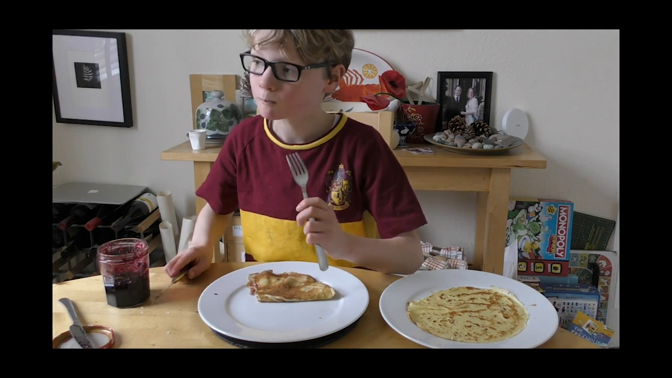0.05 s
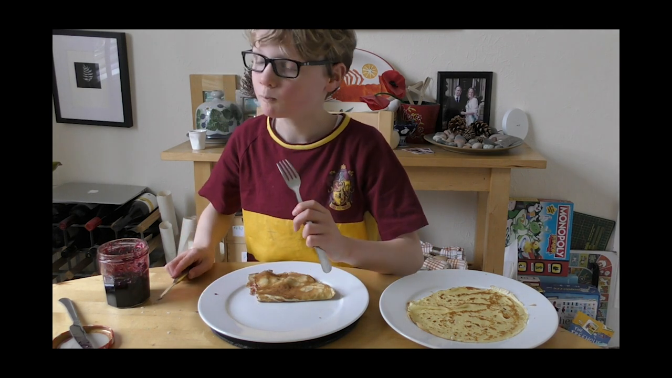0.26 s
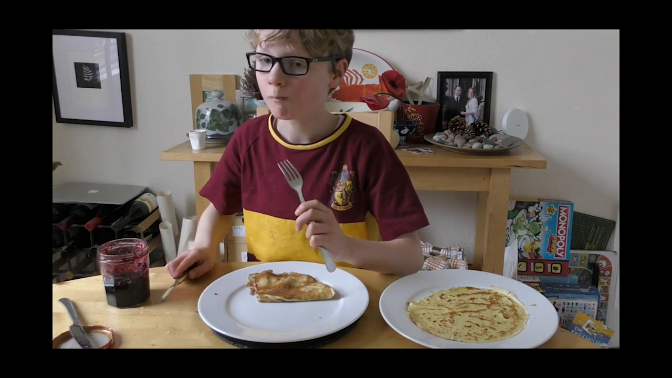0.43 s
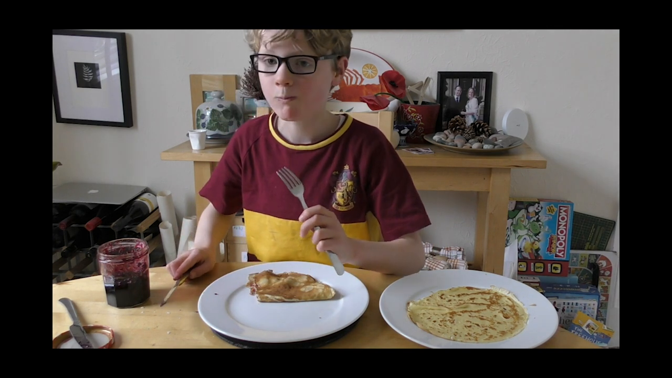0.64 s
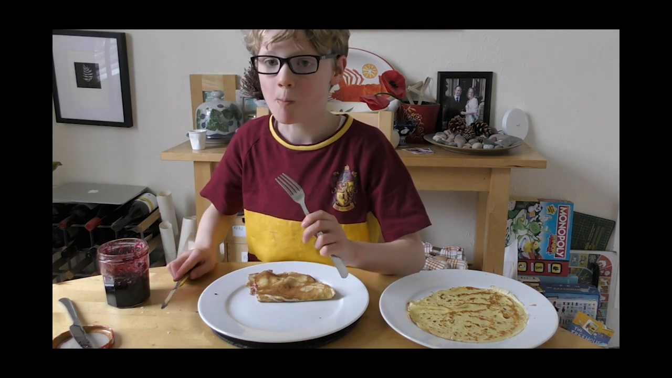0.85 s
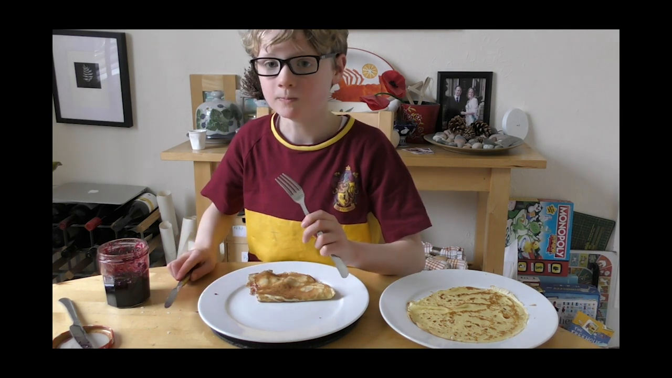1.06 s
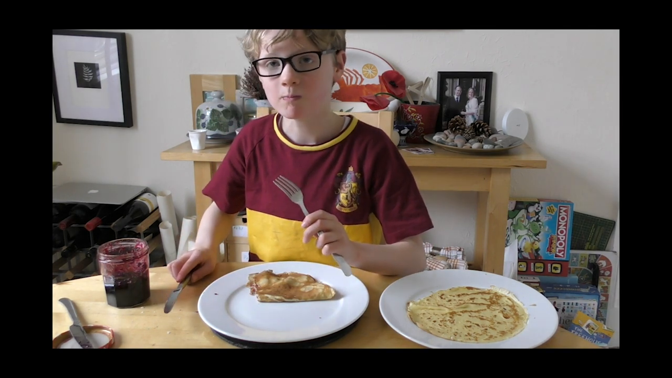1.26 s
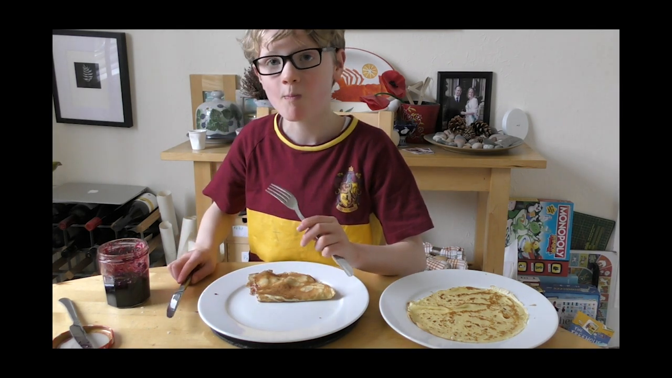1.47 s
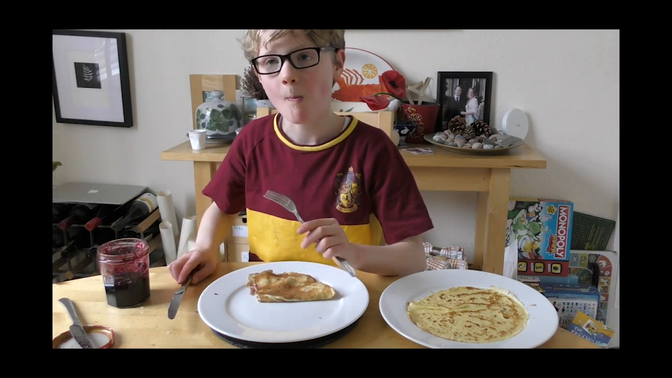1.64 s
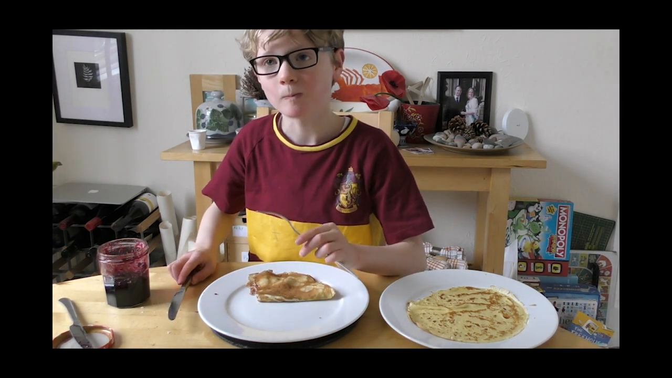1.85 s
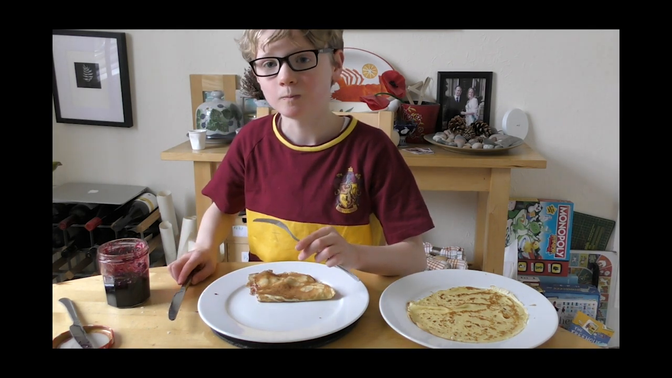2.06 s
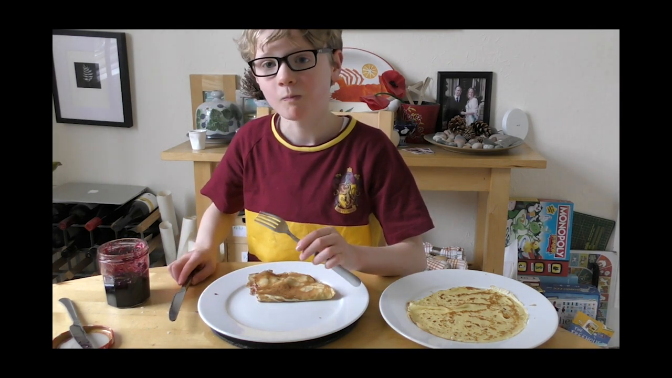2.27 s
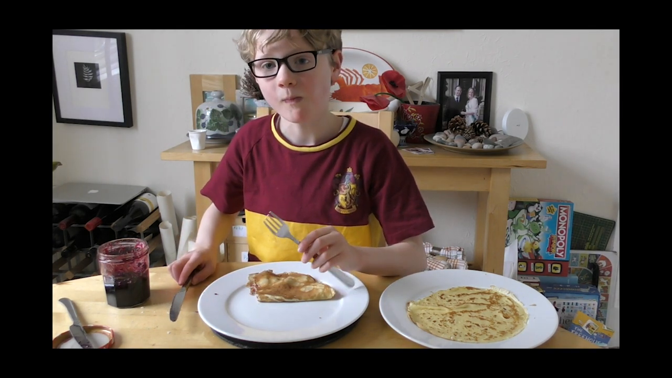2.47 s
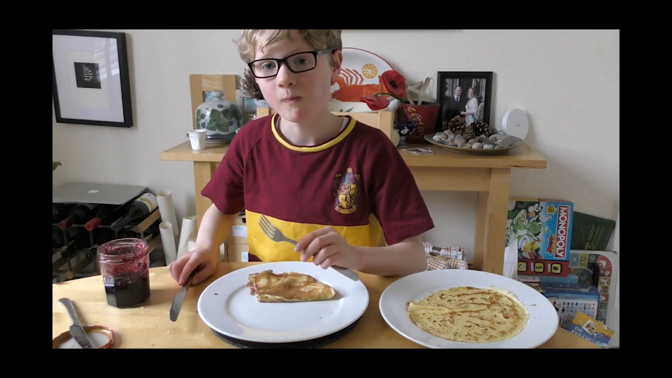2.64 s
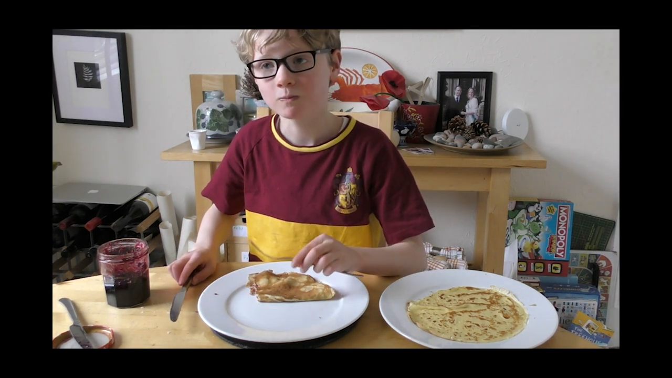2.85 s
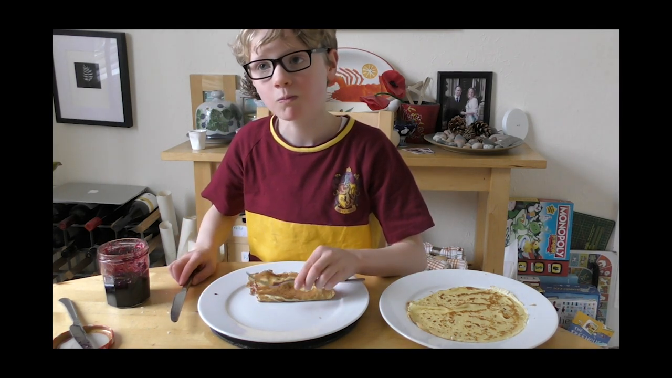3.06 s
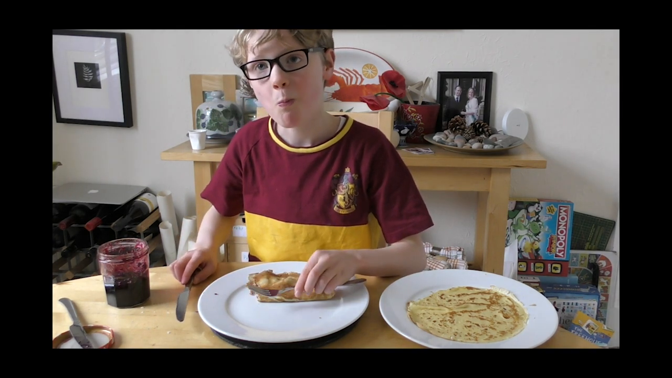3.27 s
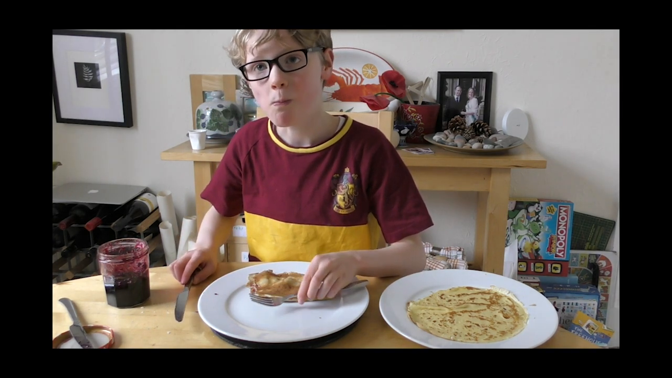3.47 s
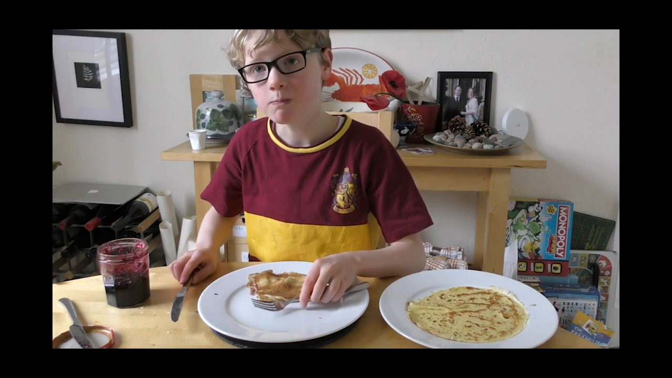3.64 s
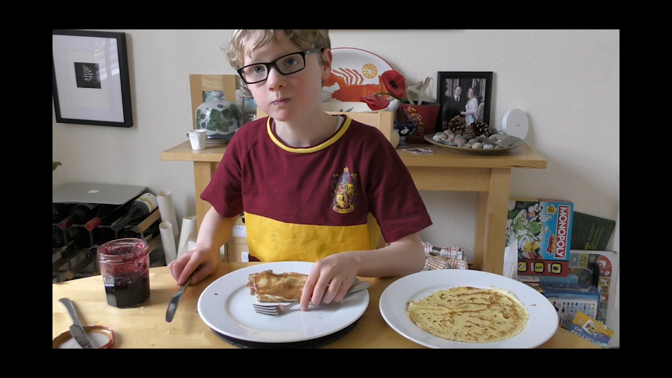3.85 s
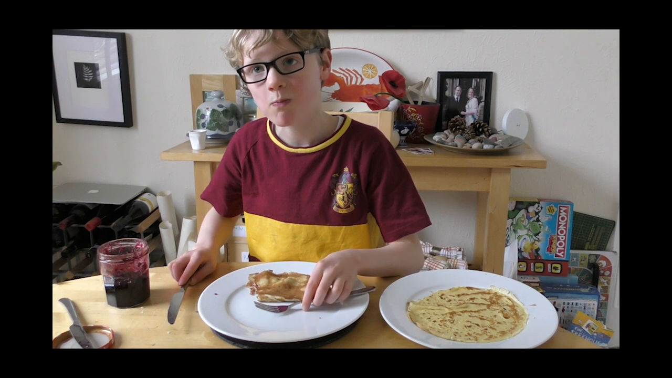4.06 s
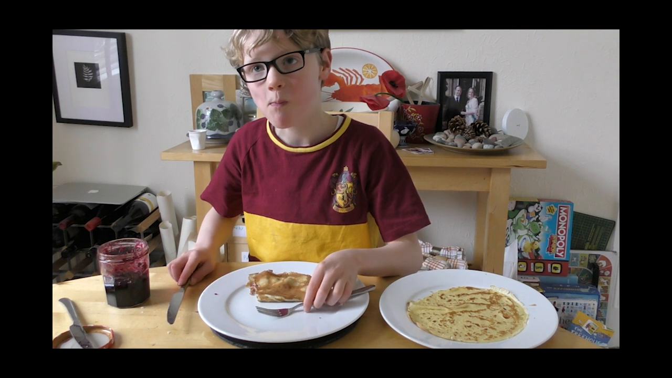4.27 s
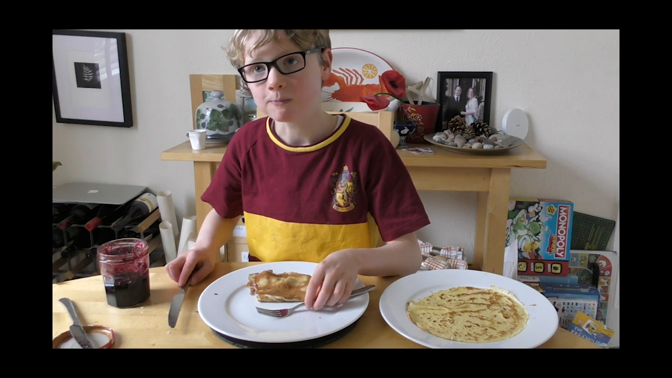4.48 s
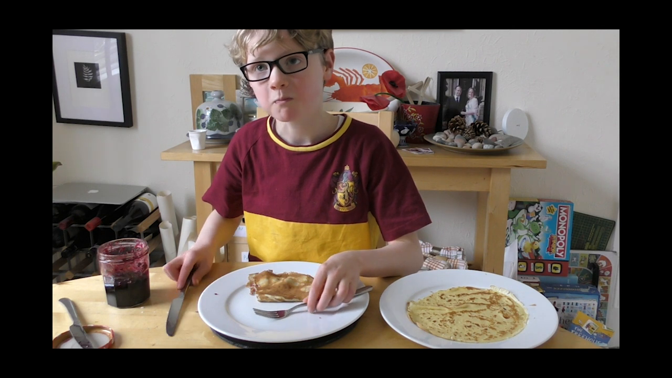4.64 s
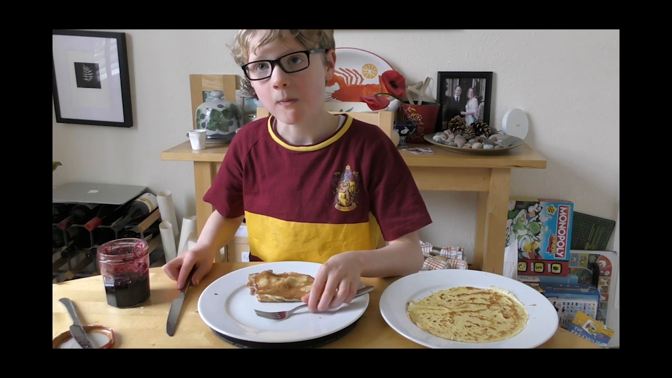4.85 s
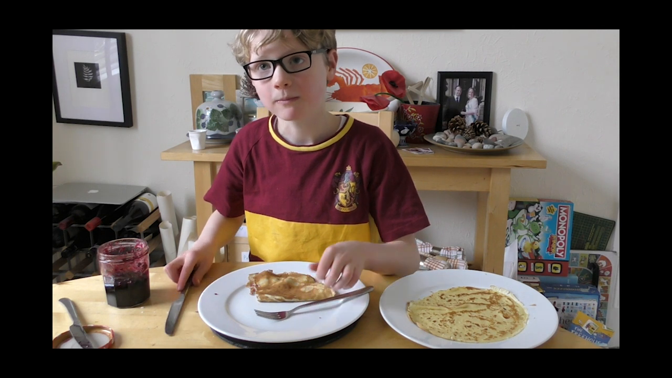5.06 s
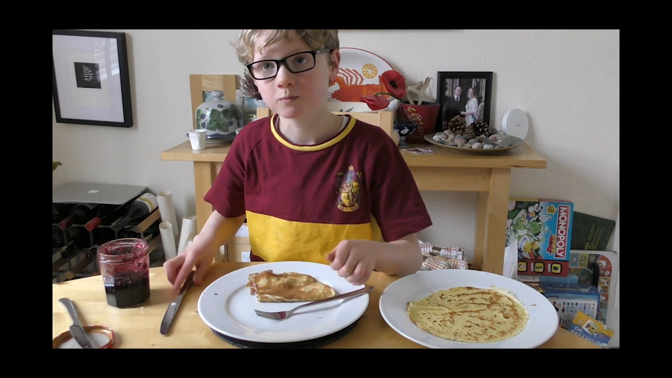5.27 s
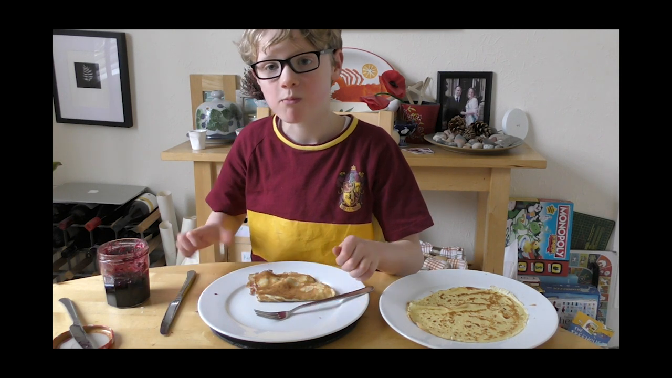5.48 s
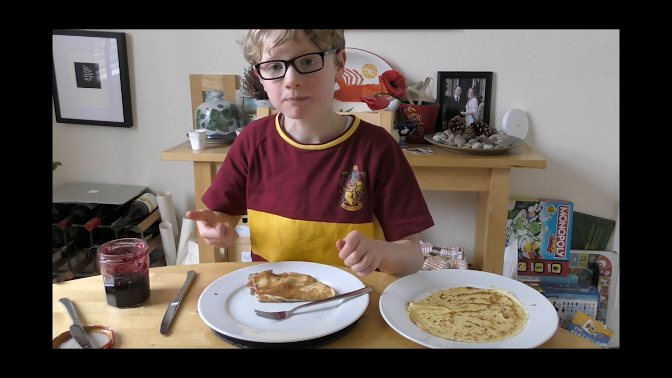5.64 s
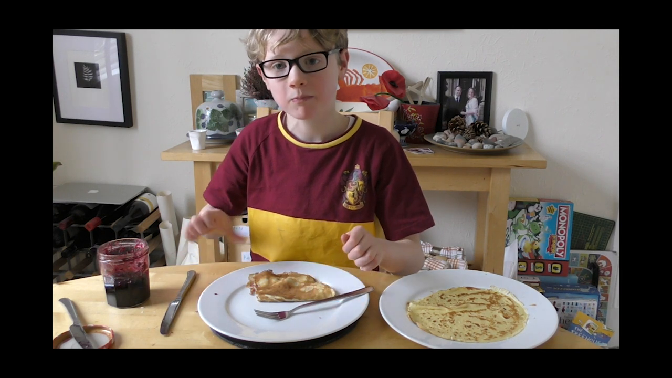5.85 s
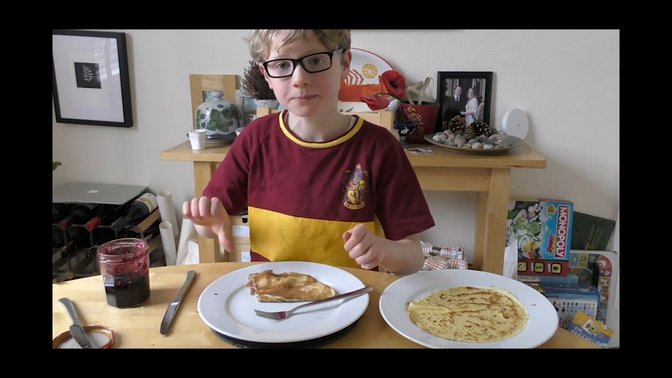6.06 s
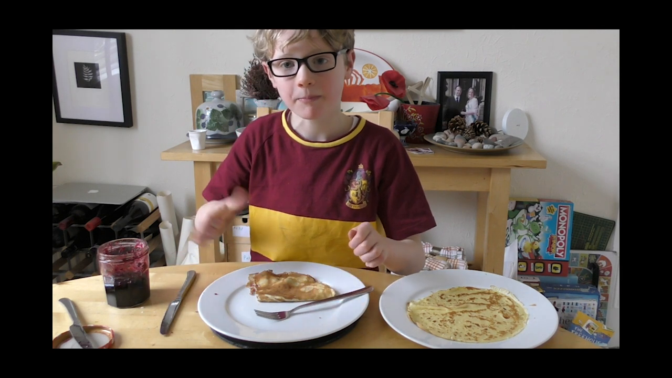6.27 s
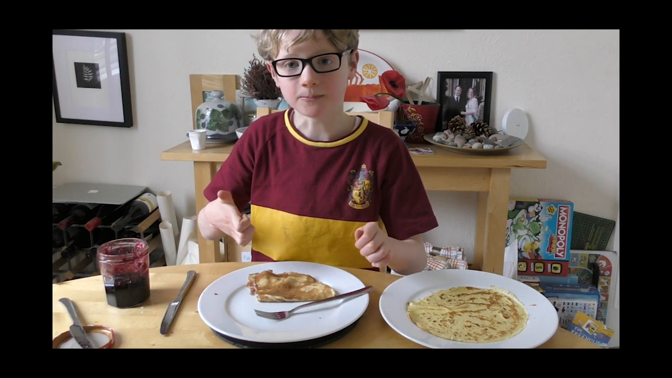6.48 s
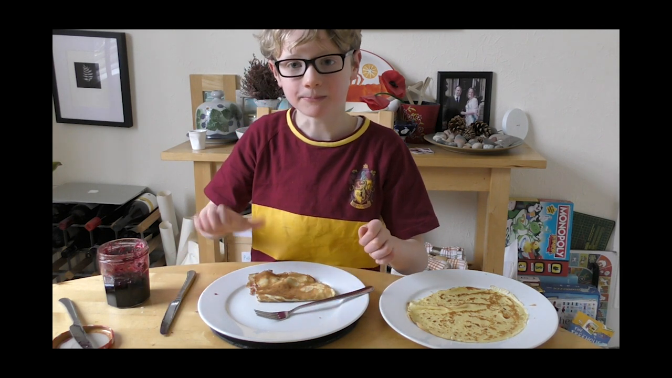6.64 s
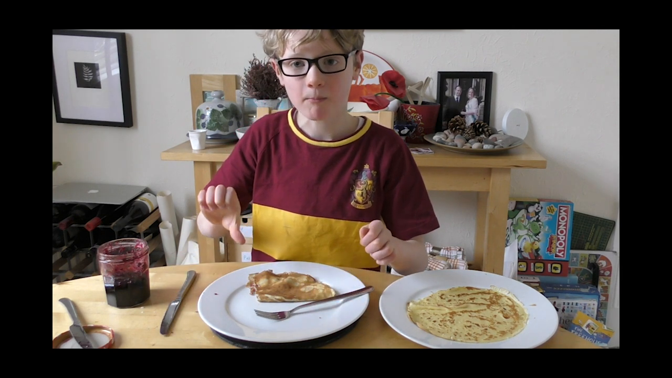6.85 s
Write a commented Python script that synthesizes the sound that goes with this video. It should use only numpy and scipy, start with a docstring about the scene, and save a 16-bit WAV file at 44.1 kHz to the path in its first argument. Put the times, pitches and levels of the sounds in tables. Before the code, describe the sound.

Close view of a dining table in a quiet small room with low rumble and faint hiss. After faint ticks and soft hand brushes, a fork strikes a china plate with a sharp ringing clink, then again a second later. It clatters down onto the plate, and a knife slides briefly and lands on wood with a dull rattling knock. Quiet follows.

```python
"""In a small dining room, a steel fork taps a china plate twice, then clatters down onto it.
A knife slides and is laid on the wooden table, where it rocks to rest. Hands and cutlery brush softly in between.
Hard contacts are short noise bursts and fading sine tones; sliding and brushing are shaped noise.
The room answers with a fading noise tail, over a low rumble, faintly wavering air and a hiss.
"""
import sys
import numpy as np
from scipy import signal
from scipy.fft import rfft, irfft, next_fast_len
from scipy.io import wavfile
from scipy.ndimage import map_coordinates

SR = 44100
rng = np.random.default_rng(int(sys.argv[2]) if len(sys.argv) > 2 else 0)


def store_wav(level_fs):
    """Save 16-bit WAV to argv[1]."""
    pcm = np.round(np.clip(np.atleast_2d(level_fs), -1, 1) * 32767)
    wavfile.write(sys.argv[1], SR, pcm.T.astype(np.int16))


N = 304731
TIPS, EDGE, BACK = 0, 1, 2  # the part of the fork that touches: tine tips, tine edge, back
TOP_HZ = 16900  # band limit of the whole sound
AGE = np.arange(int(.62 * SR)) / SR  # seconds since a contact


def fork(chatter_hz=90, between_db=-18, ring_wet_db=-5):
    """Each contact cracks and rings the plate; the tines chatter, which smears the modes into a short buzz."""
    # Fork and plate ringing together. Each row: frequency in Hz, free t60 (time to fade by 60 dB) in seconds,
    # then the level in dB when touched with the tine tips, with the tine edge, with the fork's back.
    plate_modes = [(1600, 0.2, -24, -40, -12), (1902, 0.18, -26, -28, -13), (1950, 0.23, -4, -14, -24),
                   (2583, 0.2, -23, -26, -11), (2676, 0.34, -5, -9, -15), (2824, 0.2, -22, -27, -16),
                   (3310, 0.15, -26, -19, -6), (3440, 0.17, 2, -4, -4), (3485, 0.15, -13, -5, 1),
                   (3685, 0.18, -34, -22, -9), (4295, 0.28, -15, -9, -12), (4367, 0.2, -23, -18, -13),
                   (5258, 0.35, -15, -13, -12), (6300, 0.55, -24, -29, -20), (6570, 0.4, -26, -29, -23),
                   (7470, 0.22, -14, -1, -10), (7832, 0.3, -18, -20, -22), (8455, 0.22, -34, -36, -12),
                   (8755, 0.22, -26, -17, -16), (9465, 0.26, -15, -13, -13), (9838, 0.22, -33, -30, -10),
                   (10145, 0.22, -20, -16, -13), (10215, 0.22, -29, -17, -17), (11245, 0.32, -15, -15, -21),
                   (11630, 0.28, -22, -13, -17), (12795, 0.22, -51, -49, -11), (13122, 0.22, -15, -12, -19),
                   (13445, 0.22, -24, -39, -11), (14920, 0.2, -32, -31, -23), (15090, 0.22, -28, -25, -34)]
    # The hand's grip; rows for tips, edge, back. Each row: share of the free ring time in the low modes,
    # the same share in the high modes, level change in dB of the mode near 5.3 kHz.
    hand_grip = [(1, 1, 0), (0.72, .7, -4.5), (0.32, .4, -3.5)]
    # Colour of the contact's crack. Each row: frequency in Hz, level in dB.
    crack_colour = [(200, -26), (500, -30.5), (850, -34.5), (1600, -10), (3300, 1.5), (6000, -0.5),
                    (10500, 8), (13500, -6.5), (16000, -13.5)]
    # Colour of the tines' buzz between the modes. Each row: frequency in Hz, level in dB.
    buzz_colour = [(450, -23), (850, -18.5), (1550, 0.5), (2500, -3), (3600, -0.5), (4900, -2.5),
                   (5600, -11), (6800, -8.5), (8500, 1.5), (10200, 4.5), (12300, -13.5), (13400, -10),
                   (15500, -17.5)]
    # The fork's weight jolts the table through the plate. Each row: start in seconds, level in dB.
    table_jolts = [(3.9246, -42), (4.3088, -45)]
    grip_low_hz, grip_high_hz = 2790, 3600  # the plate's modes give way to the fork's between these
    bright_from_hz = 3500  # the hardness of a contact tilts the spectrum above this
    middle_mode_hz, middle_octaves = 5260, .1  # the level of the mode here differs by touching part
    free_buzz_t60_s, crack_t60_s = 0.27, .008

    cracks, rings = np.zeros(N), np.zeros(N)
    hz, t60, *touch_db = np.transpose(plate_modes)
    in_middle_mode = abs(octaves(hz, middle_mode_hz)) < middle_octaves
    for s, part, ring_db, crack_db, buzz_db, bright_db in contacts():
        low, high, middle_db = hand_grip[part]
        grip = along([(grip_low_hz, low), (grip_high_hz, high)], hz)
        tilt_db = lambda f: bright_db * np.maximum(octaves(f, bright_from_hz), 0)
        mode_db = touch_db[part] + tilt_db(hz) + middle_db * in_middle_mode
        smeared = [(f, chatter_hz, db) for f, db in zip(hz, mode_db)]
        between = lambda f: amp(between_db + along(buzz_colour, f) + tilt_db(f))
        buzz = white(lambda f: bells(smeared, f) + between(f))
        add(rings, s, amp(ring_db) * ring(hz, mode_db, t60 * np.minimum(grip, 1)))
        add(rings, s, amp(buzz_db) * buzz * fade(free_buzz_t60_s * low))
        add(cracks, s, amp(crack_db) * noise(crack_colour) * fade(crack_t60_s))
    rings = radiated(rings)
    for s, db in table_jolts:
        thud = white(lambda f: bells([(180, 56, 0)], f))
        add(rings, s, amp(db) * thud * fade(0.36))
    return room(rings, ring_wet_db) + room(radiated(cracks), wet_db=-13)


def contacts():
    """A dropped fork bounces at a quick, even pace; rebounds are weaker and thinner, each cracking less than the last."""
    # The fork lands. Each row: start in seconds, touching part, number of bounces (rounded), ring level in dB,
    # crack level in dB, buzz level in dB, brightness in dB per octave.
    landings = [(2.4415, TIPS, 0, -16.5, -4.5, -29, -0.5), (3.5628, EDGE, 0, -16, -13, -25.5, 1.5),
                (3.9131, BACK, 0, -27.5, -19, -33.5, 2), (3.9236, BACK, 1, -22, -31.5, -21, -1.5),
                (4.056, EDGE, 0, -51.5, -60.5, -48.5, 4.5), (4.1194, TIPS, 0, -46, -62.5, -43, -3),
                (4.1445, EDGE, 0, -39, -68.5, -42, -13.5), (4.3095, BACK, 2.5, -16.5, -12.5, -18.5, 1)]
    bounce_s, crack_loss_db = .007, 6.5  # gap between bounces; loss of crack at each
    rebound_ring_db, rebound_buzz_db, rebound_bright_db = -6.5, -3, 4  # change from landing to any rebound
    for s, part, bounces, ring_db, crack_db, buzz_db, bright_db in landings:
        yield s, part, ring_db, crack_db, buzz_db, bright_db
        for k in range(1, round(bounces) + 1):
            yield (s + k * bounce_s, part, ring_db + rebound_ring_db, crack_db - k * crack_loss_db,
                   buzz_db + rebound_buzz_db, bright_db + rebound_bright_db)


def radiated(x):
    """A small plate radiates little below its lowest modes."""
    return signal.sosfilt(signal.butter(3, 1150, "highpass", fs=SR, output="sos"), x)


def table_push(boom_hz=145, boom_db=-31):
    """The table top is pushed: a single low swing with a rebound either side, and a faint boom after it."""
    # Each row: time of the peak in seconds, signed peak pressure (full scale is 1), half width in seconds.
    pushes = [(2.4451, 0.15, 0.0018), (3.5647, -0.11, 0.002), (4.314, -0.02, 0.0015),
              (5.1305, 0.0068, 0.0013)]
    t = np.arange(N) / SR
    out = np.zeros(N)
    for s, peak, width in pushes:
        u = ((t - s) / width) ** 2
        out += peak * (1 - 1.3 * u) * np.exp(-u)
        boom = np.sin(2 * np.pi * boom_hz * AGE) * fade(1.0)
        add(out, s, peak * amp(boom_db) * boom)
    return out


def knife():
    """Handle and blade land in turn and rattle on the wood; the table rings low, the blade thinly."""
    # The knife lands: handle, blade, handle. Each row: start in seconds, knock level in dB, crack level in dB,
    # top of the crack in Hz, level of the blade's ring in dB.
    knocks = [(5.1071, -27.5, -27.5, 1397, -61), (5.1258, -25.5, -12, 15350, -55.5),
              (5.139, -28, -16, 2200, -52)]
    # Colour of the wood's noisy knock. Each row: frequency in Hz, level in dB.
    wood_colour = [(30, 0.5), (100, -6.5), (155, 16.5), (290, 10), (420, -7.5), (600, 1.5), (790, -12.5),
                   (1020, 6.5), (1500, 0.5), (2700, -8), (3450, -16), (4100, -9), (4800, -21.5),
                   (5600, -21.5), (15000, -60)]
    # The table top and what stands on it. Each row: frequency in Hz, level in dB, t60 in seconds before damping.
    table_modes = [(157, -3, .5), (237, -7, .55), (330, -11, .35), (520, -10, .3), (964, -5, .5),
                   (1055, -7, .25), (1220, -3, .22), (1367, -14, .45), (1534, -13, .4), (1702, -10, .35),
                   (1945, -9, .45), (2300, -8, .2), (2790, -11, .2), (2993, -8, .22), (4188, -17, .26)]
    # The knife's blade. Each row: frequency in Hz, level in dB, t60 in seconds.
    blade_modes = [(6105, -8, .3), (7784, -6, .35), (9679, 1, .3), (10930, -10, .3), (12330, -8, .25),
                   (13010, -10, .35), (14870, -10, .3)]
    # Colour of the knife's crack, before its top is softened. Each row: frequency in Hz, level in dB.
    knife_crack_colour = [(200, -20), (1000, -2.5), (2300, 12), (4500, -14.5), (8000, -8.5), (10500, -0.5),
                          (16000, -16.5)]
    crack_t60_s = .008
    damping_t60_s = 1.2  # the knife's weight damps the table top
    wood_top_over_crack = 2.195  # a soft contact dulls the wood too, but less than its crack

    landings = [(*row, crack_t60_s) for row in knocks]
    cracks, rings = np.zeros(N), np.zeros(N)
    for s, knock_db, crack_db, top_hz, blade_db, crack_t60 in [*landings, *rocking()]:
        wood = noise(wood_colour) * fade(0.11)
        table_ring = ring(*np.transpose(table_modes), beat_hz=10.1, twin=0.87)
        wood = wood + amp(-12.5) * table_ring * fade(damping_t60_s)
        wood_top_hz = min(wood_top_over_crack * top_hz, TOP_HZ)
        wood = signal.sosfilt(signal.butter(3, wood_top_hz, fs=SR, output="sos"), wood)
        blade = ring(*np.transpose(blade_modes), beat_hz=5.3, twin=0.39)
        add(rings, s, amp(knock_db) * wood + amp(blade_db) * blade)
        # softer contacts are duller
        crack = white(lambda f: amp(along(knife_crack_colour, f)) / (1 + (f / top_hz) ** 4))
        add(cracks, s, amp(crack_db) * crack * fade(crack_t60))
    return room(rings, wet_db=-3.5) + room(cracks, wet_db=-17.5)


def rocking(count=16, scatter_db=2, uneven=.2):
    """The knife rocks to rest in uneven contacts that tend to come faster and softer, scuffing instead of cracking."""
    first_s, first_gap_s, shrink = 5.1688, .032, .91  # first contact, typical first gap, each gap over the last
    knock_db, scuff_db, blade_db = -33.5, -35, -53  # first contact, before the scatter of knock and scuff
    loss_db, scuff_loss_db = 5.5, 2  # loss per contact; the scuffs fade more slowly
    scuff_top_hz, scuff_t60_s = 1450, .025
    s = first_s
    for k, (size, pace) in enumerate(rng.standard_normal((count, 2))):
        scatter = scatter_db * size
        yield (s, knock_db - k * loss_db + scatter, scuff_db - k * scuff_loss_db + scatter,
               scuff_top_hz, blade_db - k * loss_db, scuff_t60_s)
        s += first_gap_s * min(shrink, 1) ** k * np.exp(uneven * pace)


def slide(slips_per_s=900, bright_db=1, grit_db=-17, grit_top_hz=3000, catch_db=2.0, catches_per_s=90):
    """Tiny slips excite the steel and the surface under it; the steel catches and frees itself unevenly."""
    # What the sliding excites. Each row: frequency in Hz, width in Hz, level in dB.
    sliding_modes = [(200, 120, 0), (560, 220, -2), (1100, 70, 5), (1940, 90, -3), (2290, 260, -6),
                     (3030, 70, -4), (3930, 110, -8), (5280, 70, -16), (7560, 70, -5), (9680, 30, -2),
                     (10900, 35, -3), (12310, 35, -1), (13000, 40, -9), (14900, 85, -8)]
    # the knife is dragged before it is let go, and swells as the hand presses
    start_s, length_s, level_db, swell_db_per_s = 4.695, .095, -53, 34.5
    # the fingers leave the fork with a thin squeak of steel
    squeak_s, squeak_length_s, squeak_db, squeak_hz, squeak_width_hz = 4.61, .075, -63, 7540, 71

    grains = rng.standard_normal(N)
    slip_now = rng.random(N) < slips_per_s / SR
    slips = grains * (.3 + slip_now * 4)

    def body(hz):
        """Resonances of steel and surface, tilted brighter, plus a bed of grit."""
        grit = amp(grit_db) / (1 + (hz / grit_top_hz) ** 2)
        return bells(sliding_modes, hz) * amp(bright_db * octaves(hz, 1000)) + grit

    scrape = amp(level_db) * unit(filtered(slips, body)) * stroke(start_s, length_s, swell_db_per_s)
    squeak = white(lambda hz: bells([(squeak_hz, squeak_width_hz, 0)], hz), size=N)
    squeak = amp(squeak_db) * squeak * stroke(squeak_s, squeak_length_s)
    return amp(catch_db * wobble(catches_per_s)) * (scrape + squeak)


def stroke(start, length, swell_db=0):
    """Attack, hold and release of a sliding stroke; it swells by swell_db a second while held."""
    attack_s, release_s = .01, .012  # time constants
    t = np.maximum(np.arange(N) / SR - start, 0)
    held = np.minimum(t, length)
    return (1 - np.exp(-t / attack_s)) * amp(swell_db * held) * np.exp(-(t - held) / release_s)


def brushes(count=14, scatter_db=2.5, scatter_octaves=0.22):
    """Light touches and fainter rustles: short puffs of friction noise; the longer ones also start more softly."""
    # Soft brushes of hands and cutlery. Each row: start in seconds, level in dB, centre in Hz, t60 in seconds.
    soft_brushes = [(1.715, -62.5, 1360, 0.21), (2.294, -54.5, 1410, 0.24), (2.802, -60, 1750, .4),
                    (2.907, -49, 2210, 0.13), (2.914, -57, 6300, 0.19), (3.195, -50, 1770, 0.065),
                    (4.67, -54, 1830, .13), (6.218, -59.5, 4200, .08)]
    width_octaves, rise_share = .36, 0.027  # width of a brush; its rise time over its t60
    # faint stirrings of sleeves and hands, at random times: middle level, middle pitch, decay
    rustle_db, rustle_hz, rustle_t60_s = -68, 1600, 0.14
    out = np.zeros(N)
    rustles = []
    for when, size, colour in rng.random((count, 3)):
        db = rustle_db + scatter_db * (2 * size - 1)
        centre_hz = rustle_hz * 2 ** (scatter_octaves * (2 * colour - 1))
        rustles.append((when * N / SR, db, centre_hz, rustle_t60_s))
    for s, db, centre_hz, t60 in [*soft_brushes, *rustles]:
        rise = 1 - np.exp(-AGE / (rise_share * t60))
        add(out, s, amp(db) * puff(centre_hz, width_octaves, t60) * rise)
    return out


def ticks():
    """Sharp little ticks that do not ring, with a clear room tail: very short puffs of wide noise."""
    # Each row: start in seconds, level in dB, centre in Hz.
    sharp_ticks = [(1.540, -48, 4500), (1.6843, -36, 9000)]
    out = np.zeros(N)
    for s, db, centre_hz in sharp_ticks:
        add(out, s, amp(db) * puff(centre_hz, width=1.23, t60=0.009))
    return room(out, wet_db=0)


def puff(centre_hz, width, t60):
    """A dying band of noise, width in octaves."""
    return white(lambda hz: np.exp(-.5 * (octaves(hz, centre_hz) / width) ** 2)) * fade(t60)


def room(x, wet_db):
    """Direct sound plus the room's diffuse answer, a fading noise tail drawn anew every third of a second."""
    # The room's decay. Each row: frequency in Hz, t60 in seconds.
    room_decay = [(150, .65), (500, .56), (1500, .52), (3500, .41), (8000, .35), (15000, .26)]
    out = x.copy()
    step = SR // 3
    for start in range(0, N, step):
        piece = x[start:start + step]
        if not piece.any():
            continue
        hz, t, z = signal.stft(rng.standard_normal(len(AGE)), SR, nperseg=256)
        decay = amp(-60 * t / along(room_decay, hz)[:, None])
        tail = signal.istft(z * decay, SR, nperseg=256)[1][:len(AGE)]
        tail = tail * (1 - np.exp(-AGE / 0.0027))  # the answer builds up quickly, but not at once
        add(out, start / SR, amp(wet_db) * signal.fftconvolve(piece, tail / np.linalg.norm(tail)))
    return out


def background():
    """The room's low rumble and air, both slightly wavering noise, and the microphone's steady hiss."""
    # Colour of the rumble. Each row: frequency in Hz, level in dB.
    rumble_colour = [(15, -25), (32, -22.5), (55, -16), (100, -8), (125, -4), (170, -2.5), (215, -2.5),
                     (265, -2.5), (300, -9), (345, -13), (395, -28.5), (500, -47), (800, -79.5)]
    # Faint bands in the room's air. Each row: frequency in Hz, width in Hz, level in dB.
    air_bands = [(650, 38, 8.5), (1019, 130, 6.5), (1490, 300, 4.5), (1817, 45, 11.5), (2530, 220, -4),
                 (3060, 23, 1.5), (3240, 40, 8), (3810, 300, 3.5), (4750, 220, 2.5), (5246, 160, -5),
                 (5870, 660, -1.5), (6600, 470, -2.5)]
    # Colour of the hiss. Each row: frequency in Hz, level in dB.
    hiss_colour = [(200, -13), (480, -11.5), (850, -12.5), (1500, -18), (2300, -10.5), (4300, -20.5),
                   (6400, -19), (7300, -12), (8300, -7), (10300, 0), (14000, -3.5), (15700, -5.5),
                   (16100, -28)]
    waver = amp(.9 * np.array([wobble(7), wobble(5)]))
    rumble = amp(-56.0) * waver[0] * noise(rumble_colour, size=N)
    air = amp(-75.0) * waver[1] * white(lambda hz: bells(air_bands, hz), size=N)
    hiss = amp(-64.0) * noise(hiss_colour, size=N)
    return rumble + air + hiss


def ring(hz, db, t60, beat_hz=9, twin=0.75):
    """Damped modes; each has a weaker twin close by, so that it beats as it fades."""
    draw = rng.random((len(hz), 4))
    out = np.zeros(len(AGE))
    for f, level, life, (phase, twin_phase, split, luck) in zip(hz, db, t60, draw):
        t = AGE[AGE < 1.2 * life]
        twin_f = f + beat_hz * (1 + split) * np.sign(luck - .5)  # above or below by chance
        main_tone = np.sin(2 * np.pi * (f * t + phase))
        twin_tone = np.sin(2 * np.pi * (twin_f * t + twin_phase))
        out[:len(t)] += amp(level - 60 * t / life) * (main_tone + twin * twin_tone)
    return out / np.hypot(1, twin)


def bells(resonances, hz):
    """Gain of a set of (Hz, width Hz, dB) resonances with steep skirts."""
    return np.sqrt(sum(amp(2 * db) / (1 + ((hz - centre) / width) ** 2) ** 2
                       for centre, width, db in resonances))


def white(response, size=len(AGE)):
    """Noise of rms 1 with the given response."""
    return unit(filtered(rng.standard_normal(size), response))


def noise(colour, size=len(AGE)):
    """Noise of rms 1 with a (Hz, dB) colour."""
    return white(lambda hz: amp(along(colour, hz)), size)


def wobble(rate):
    """A smooth random curve, rate knots a second."""
    knots = rng.standard_normal(int(N * rate / SR) + 4)
    return map_coordinates(knots, [np.arange(N) * rate / SR])


def filtered(x, response):
    """x times a response of frequency."""
    m = next_fast_len(len(x) + SR // 2)
    return irfft(rfft(x, m) * response(np.fft.rfftfreq(m, 1 / SR)), m)[:len(x)]


def along(points, hz):
    """Read a value between (Hz, value) points on a log axis."""
    f, v = np.transpose(points)
    return np.interp(np.log(hz + 1), np.log(f + 1), v)


def octaves(hz, centre_hz):
    """Distance from a centre frequency in octaves."""
    return np.log2((hz + 1) / centre_hz)


def fade(t60):
    """Free decay after a blow: down by 60 dB after t60 seconds."""
    return amp(-60 * AGE / np.maximum(t60, 1e-4))


def amp(db):
    """Turn dB into a plain factor."""
    return 10 ** (np.asarray(db) / 20)


def unit(x):
    """Scale a sound to rms 1."""
    return x / np.sqrt(np.mean(x ** 2) + 1e-20)


def add(track, s, sound):
    """Mix a sound into the track at time s in seconds."""
    part = track[round(s * SR):][:len(sound)]
    part += sound[:len(part)]


def scene():
    """Fork, table, knife and small touches in the dining room."""
    touches = room(slide() + brushes(), wet_db=-4.0) + ticks()
    return (fork() + table_push() + knife() + touches + background())[None]


def record(dry):
    """The recorder rounds the highest peaks and keeps nothing above its band limit."""
    rounded = dry[0] / (1 + (dry[0] / .7) ** 4) ** (1 / 4)
    return filtered(rounded, lambda hz: np.clip((TOP_HZ - hz) / 700, 0, 1) ** 2)[None]


dry = scene()
out = record(dry)
store_wav(out)
```